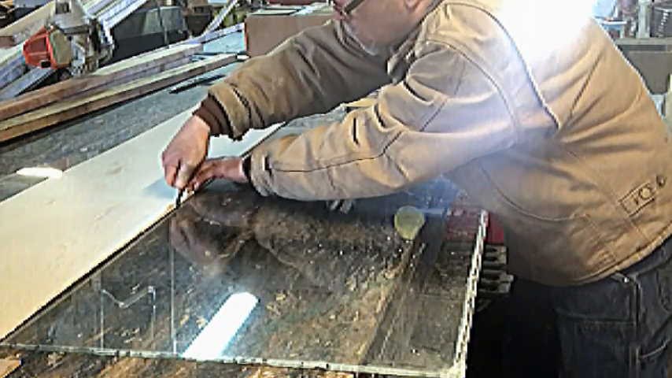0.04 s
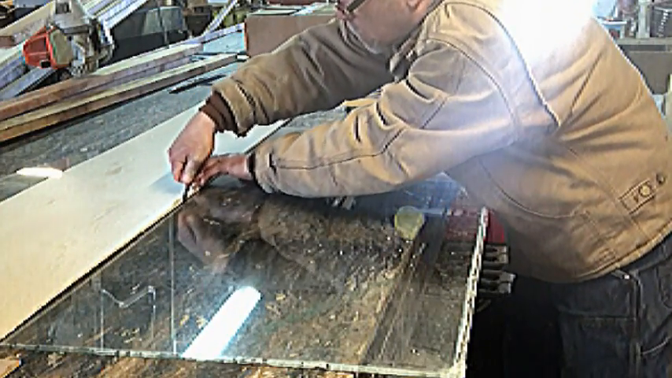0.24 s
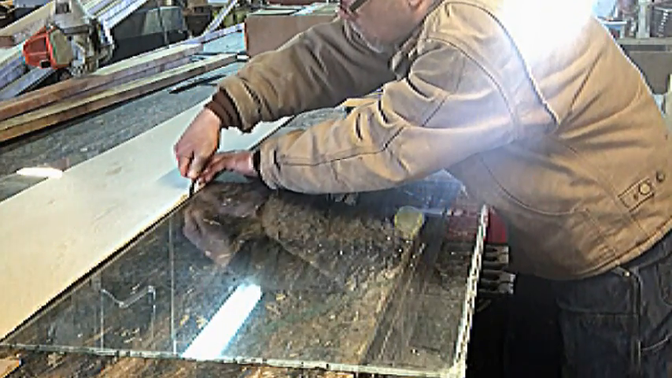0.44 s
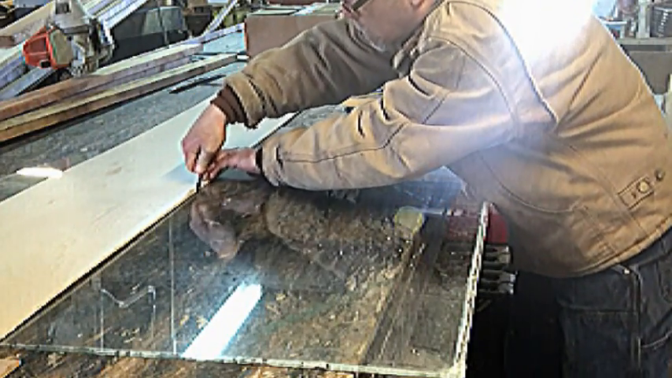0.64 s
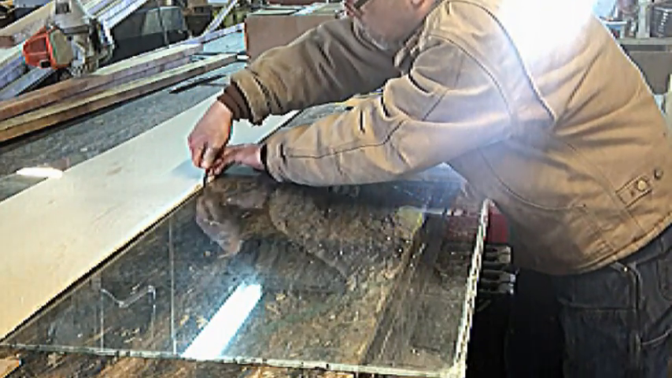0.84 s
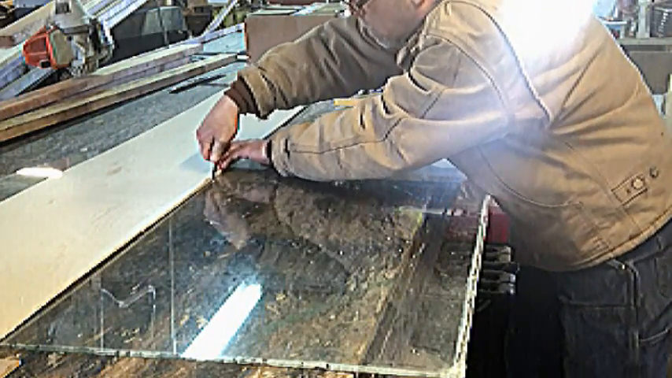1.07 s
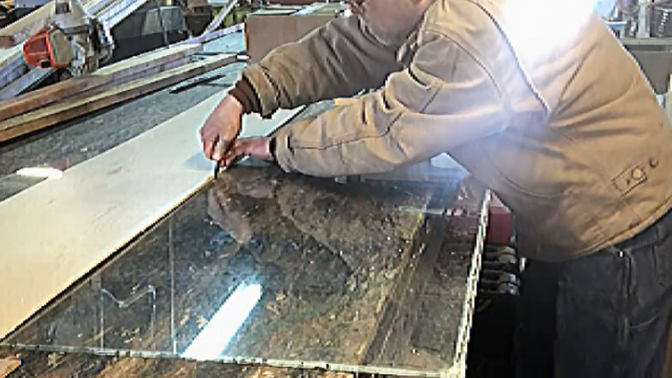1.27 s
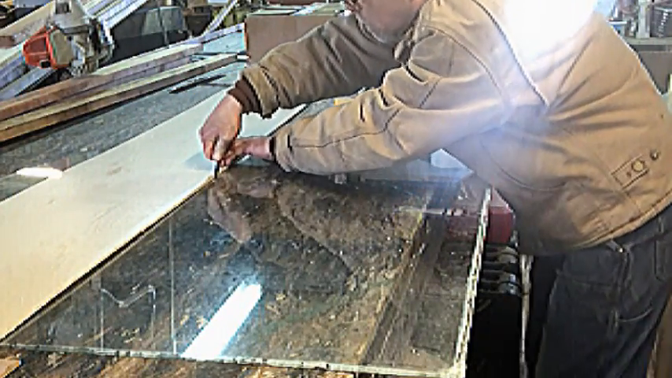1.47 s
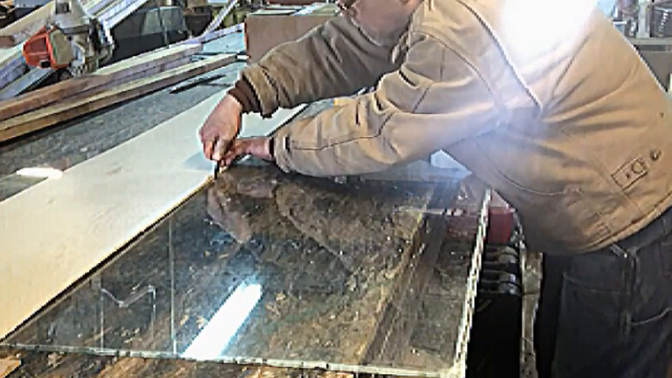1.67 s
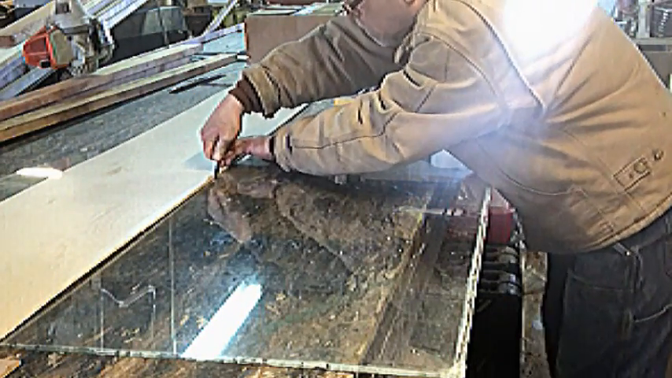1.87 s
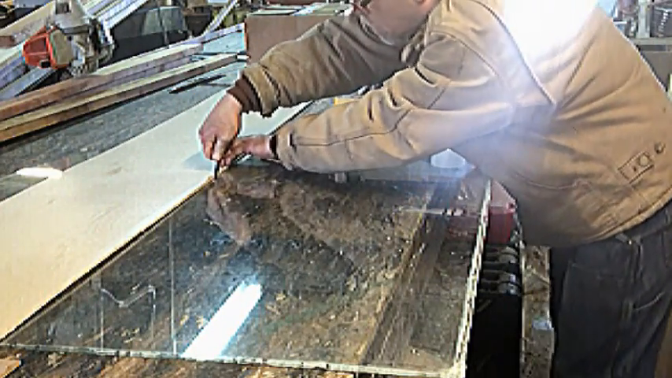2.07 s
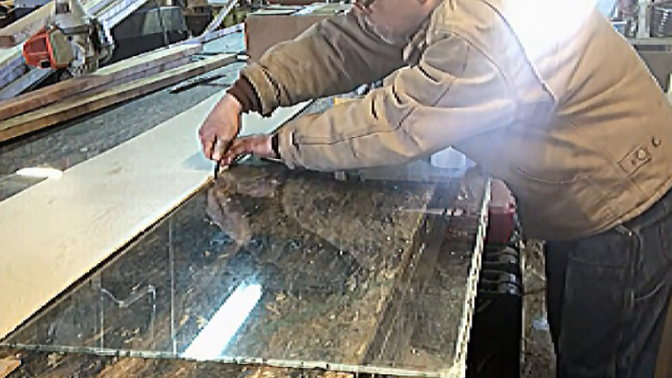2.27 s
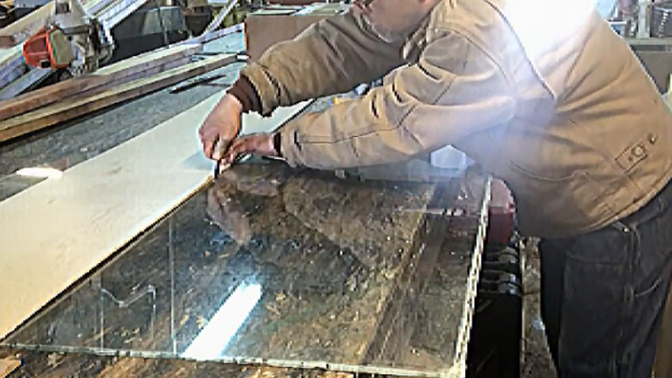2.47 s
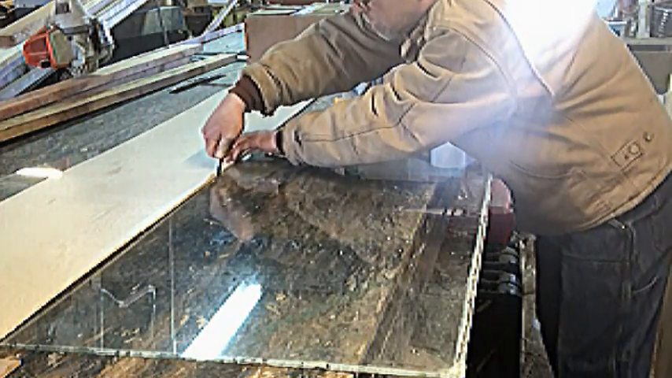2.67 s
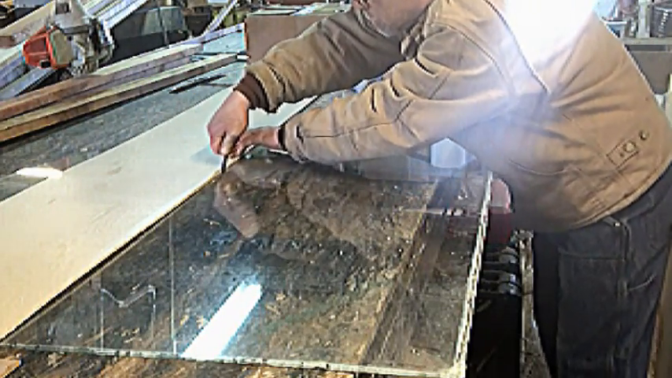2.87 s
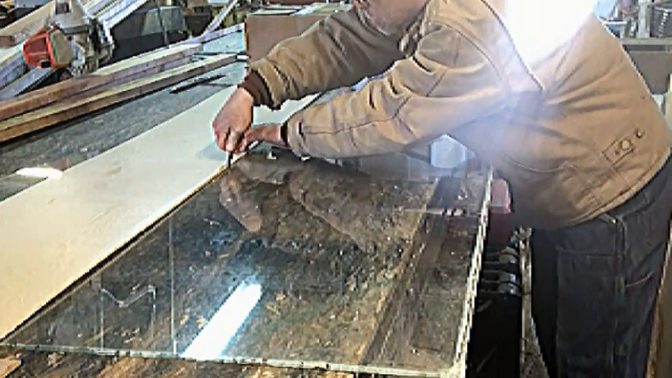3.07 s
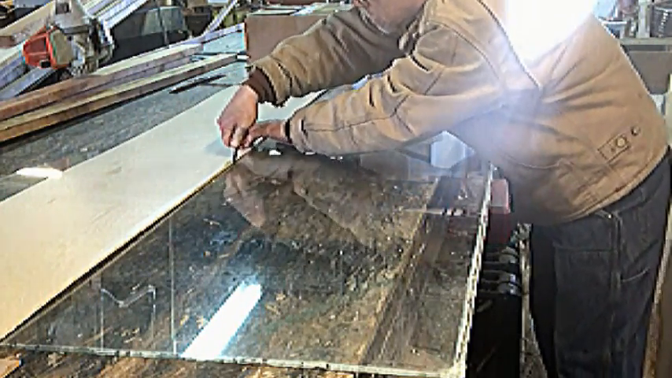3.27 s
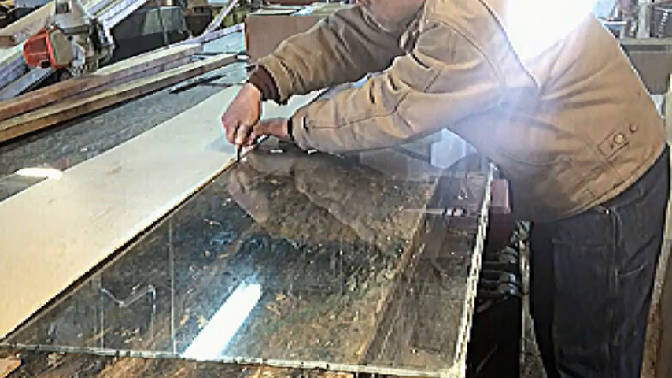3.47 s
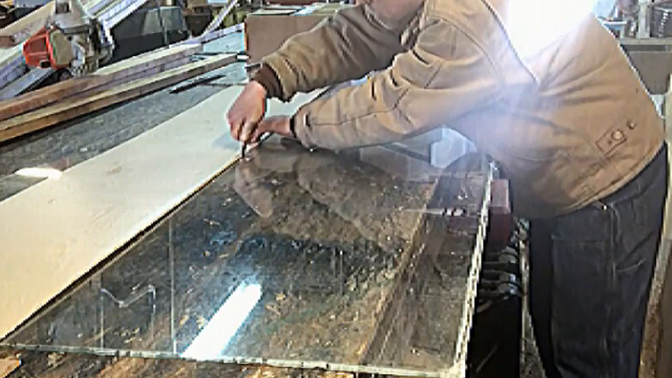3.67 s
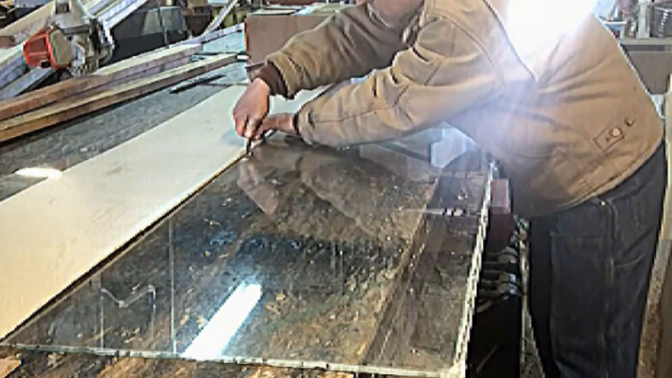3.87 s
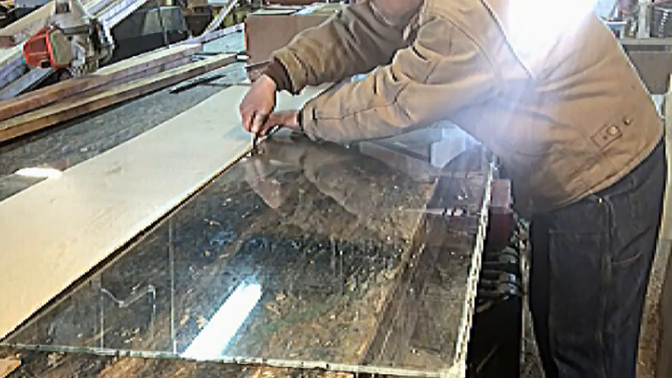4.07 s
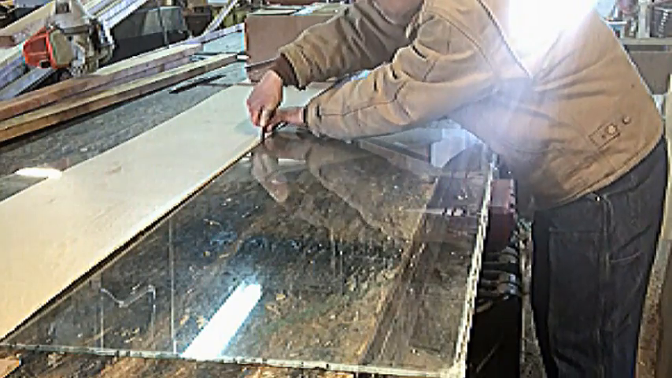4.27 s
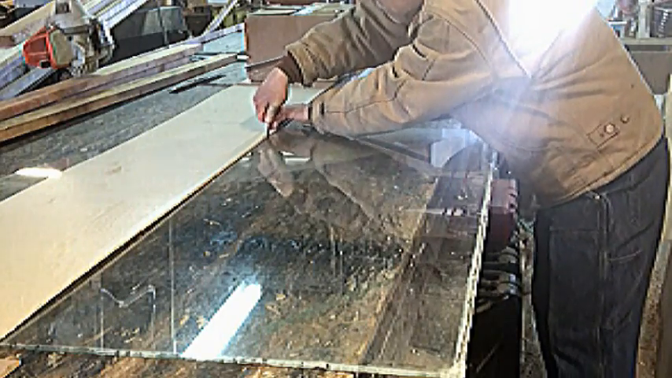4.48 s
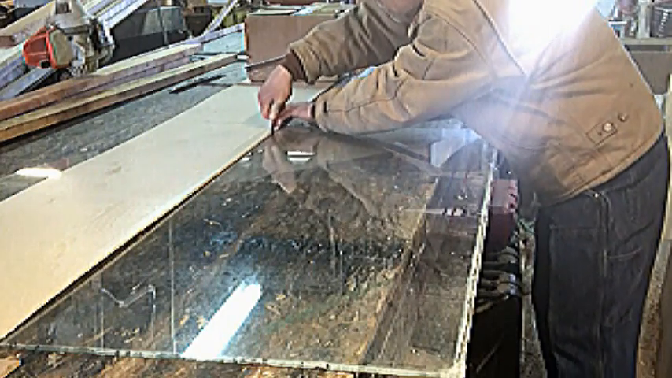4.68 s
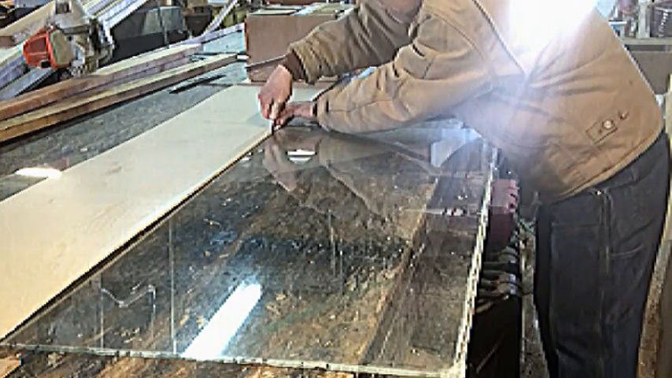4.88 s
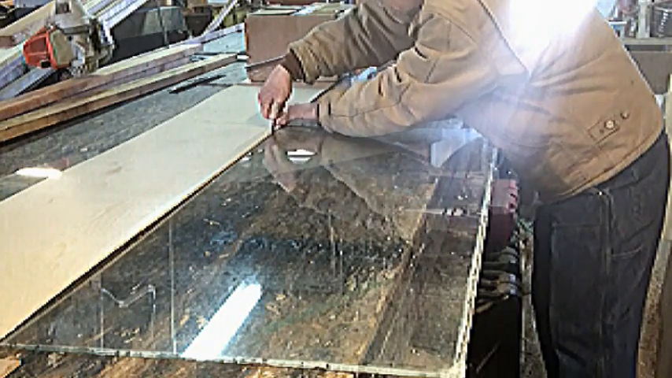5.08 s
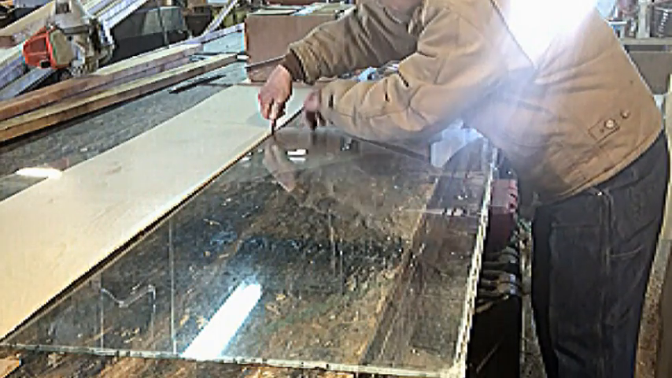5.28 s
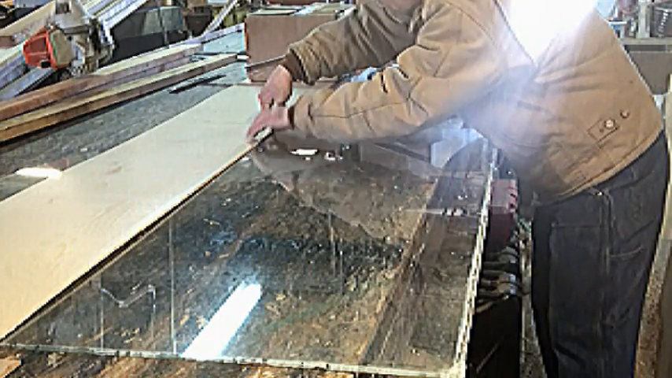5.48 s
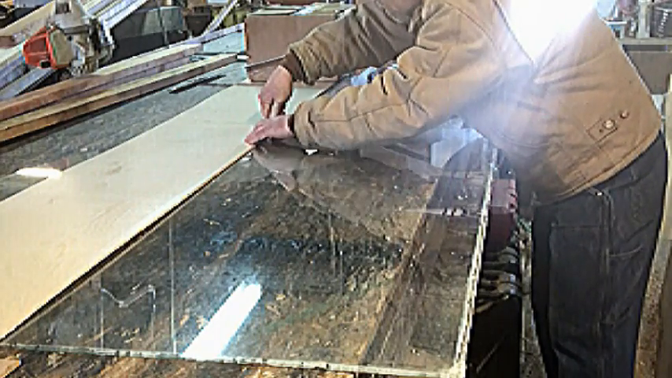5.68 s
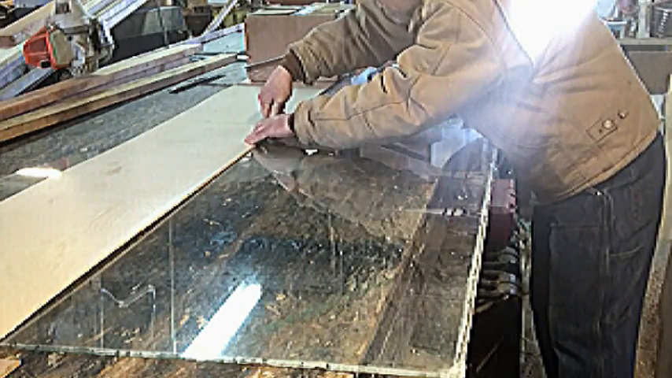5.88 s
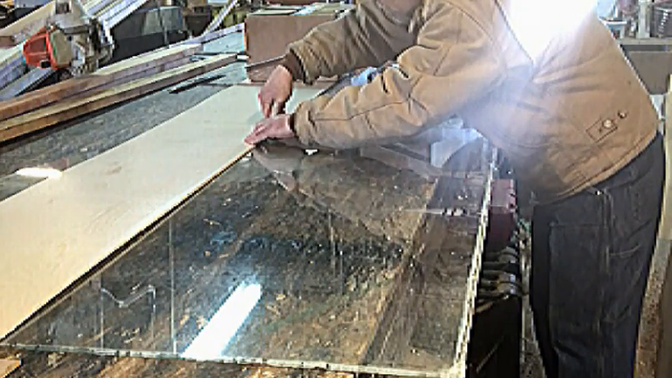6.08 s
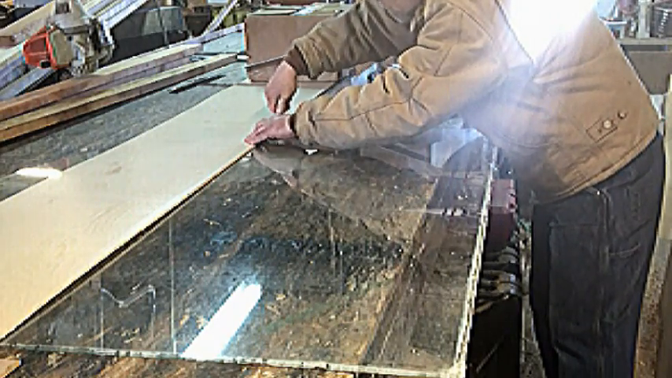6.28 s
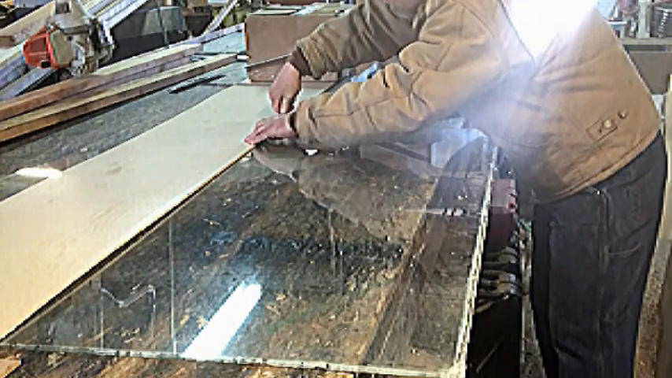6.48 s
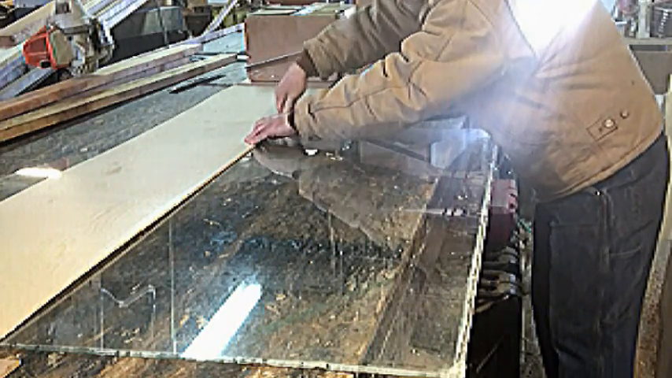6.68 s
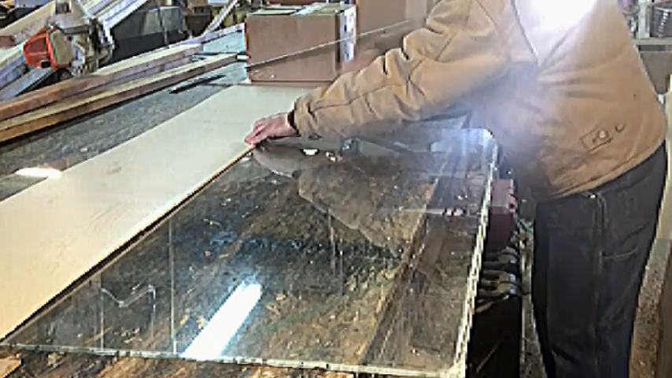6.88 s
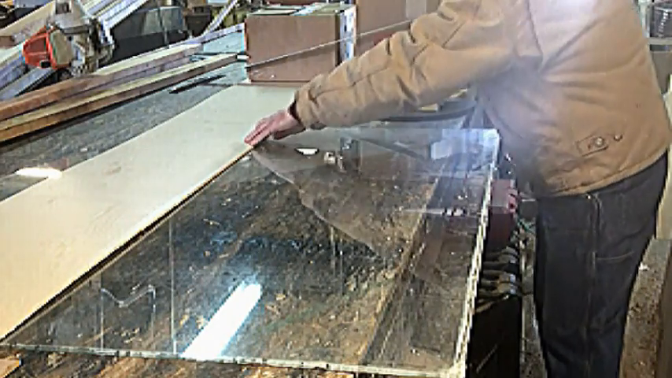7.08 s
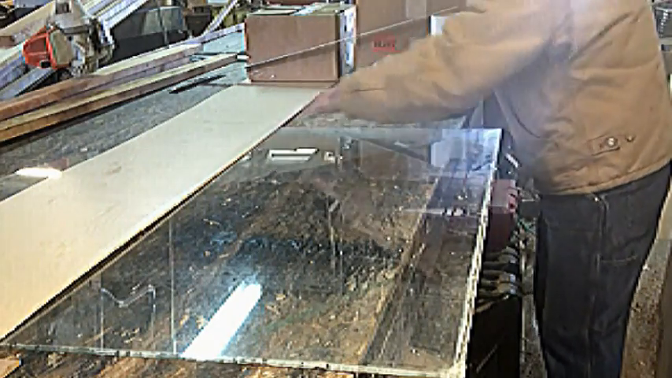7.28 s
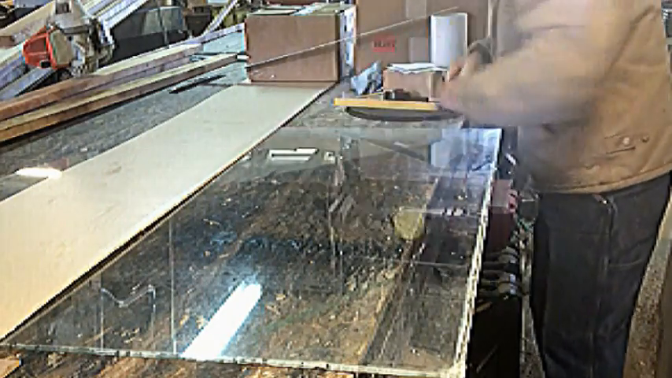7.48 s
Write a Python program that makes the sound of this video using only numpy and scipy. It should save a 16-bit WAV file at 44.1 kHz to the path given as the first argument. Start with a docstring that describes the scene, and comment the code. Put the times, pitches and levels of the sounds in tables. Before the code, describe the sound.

A hand-held glass cutter scores a pane close by in a workshop, making a gritty, ringing hiss with tiny crackles. It pauses for soft rubs and bumps of the straightedge, then makes a second, longer stroke. After a few light taps, a brief final stroke runs off the edge and strikes the bench with a sharp thud. Faint air noise and electrical hum lie underneath.

```python
"""A gritty, ringing hiss, close by in a workshop: a glass cutter's wheel scores a pane in three strokes.
Each tiny chip crushed out of the glass is an impulse that excites bending waves. These radiate best at
coincidence, where they match the speed of sound, and the ring changes as the wheel travels.
Between strokes the hands shift and bump the straightedge; the last stroke runs off the edge and strikes
the bench, which thuds and sways. Air noise and mains hum lie underneath."""
import sys
import numpy as np
from scipy import signal
from scipy.fft import rfft, irfft
from scipy.io import wavfile
from scipy.ndimage import uniform_filter1d

SR = 44100
rng = np.random.default_rng(int(sys.argv[2]) if len(sys.argv) > 2 else 0)


def bounce(signal):
    """Save signal as a 16-bit WAV file at the path given by the first command-line argument."""
    frames = np.transpose(np.atleast_2d(signal))
    limited = np.clip(frames, -1, 1)
    pcm = np.round(limited * 32767).astype(np.int16)
    wavfile.write(sys.argv[1], SR, pcm)


N = 332514
TIME = np.arange(N) / SR

# Levels in the tables are relative.
# spectrum of the workshop's air noise: f/Hz, level/dB
AIR_SPECTRUM = [(18, -46.5), (33, -2), (58, -1.5), (88, -3.5), (125, -4.5), (180, -8), (560, -13.5),
                (1300, -17), (2700, -23.5), (3700, -24), (6500, -28.5), (10300, -36.5), (12500, -35),
                (15500, -35)]
# mains hum: f/Hz, level/dB
HUM_PARTIALS = [(59.2, -62), (118.4, -65.5)]
# sliding rubs, and two low swells as the straightedge is dragged: t/s, half length/s, level/dB, centre f/Hz,
# bandwidth/Hz
SWELLS = [(1.267, 0.033, -45.5, 1660, 2520), (1.681, 0.042, -46, 2560, 5360),
          (1.705, 0.056, -44.5, 1240, 1220), (1.712, 0.11, -46.5, 150, 170),
          (2.038, 0.16, -55.5, 2290, 5740), (2.167, 0.29, -51.5, 179, 170), (4.88, 0.088, -51, 1060, 1550),
          (5.141, 0.049, -53, 3880, 5000), (5.259, 0.018, -46, 3920, 4200), (5.533, 0.013, -58, 4500, 7000),
          (7.0, 0.21, -63.5, 2910, 7600), (7.12, 0.063, -56, 4670, 5500), (7.485, 0.09, -54, 600, 1400)]
# blows on pane and bench: t/s, thud level/dB, clack level/dB, tick level/dB, clack cutoff f/Hz
KNOCKS = [(1.527, -41.5, -46, -58, 1400), (1.546, -37.5, -34.5, -51, 1280), (1.555, -44, -43, -46, 1490),
          (1.909, -68, -52, -61.5, 2200), (1.951, -36.5, -45, -58, 1580), (1.975, -34, -45.5, -53, 915),
          (1.995, -37, -54, -73, 400), (2.019, -41, -44.5, -57, 1800), (2.083, -43, -49.5, -61, 1500),
          (4.767, -47, -54, -68, 400), (4.843, -61.5, -63, -56, 2000), (5.102, -47.5, -72, -70, 250),
          (5.218, -48, -60, -57, 300), (5.519, -58, -64, -54, 600), (6.308, -22, -18, -28, 1700),
          (6.358, -34.5, -38.5, -53, 700), (6.513, -47, -62.5, -62.5, 696), (7.447, -66, -35.5, -63, 590)]
# modes of the bench: f/Hz, level/dB, T60/s
BENCH_MODES = [(49.4, -8.5, 0.27), (101.4, -2.5, 0.077), (111, -2.5, 0.18), (131, 0, 0.083),
               (156, -1.5, 0.13), (241.6, -6.5, 0.17), (264.6, -6.5, .1)]
# modes of the pane lying on it: f/Hz, level/dB, T60/s
PANE_MODES = [(342, -6, 0.082), (378, 2.5, 0.069), (466, -26, 0.097), (529, 5.5, 0.081), (588, -0.5, 0.11),
              (640, 1, 0.025), (790, 3, 0.042), (887, 4, 0.088), (1167, -9, 0.065), (1640, -2, 0.1),
              (1890, 0.5, 0.11), (1930, 2, 0.063)]
# strokes: start t/s, end t/s, slowing time/s, hiss level/dB, rolling level/dB, shudder level/dB,
# level of the ring's extra peak/dB, ring centre at the start f/Hz, at the end f/Hz
STROKES = [(0.0, 1.241, 0.12, -4.5, -14.5, -30, -10, 3690, 3720),
           (2.637, 4.732, 0.36, -2.5, -12, -22, -28, 3704, 3770),
           (6.101, 6.308, 0.006, -2, -17, -43, 0, 3760, 3850)]
# hand pressure, as the ring it excites, one curve per stroke: t/s, level/dB
PRESSURE_CURVES = [
    [(0, -26), (.42, -26.5), (.63, -23), (.78, -27), (.95, -22.5), (1.24, -28.5)],
    [(2.635, -28), (2.8, -28.5), (3.07, -24), (3.42, -26), (3.75, -26), (4.18, -22.5), (4.42, -24.5),
     (4.65, -23.5), (4.735, -28)],
    [(6.105, -29), (6.165, -19), (6.235, -18.5), (6.31, -14.5)],
]
# the wheel skids and loses its bite: t/s, half length/s, ring change/dB, hiss change/dB
SKIDS = [(0.355, 0.01, -14, -11), (0.383, 0.011, -10, -6), (.745, 0.0062, -9, -6), (0.82, 0.0068, -22, -5),
         (0.872, .013, -15, -5.5), (1.166, 0.0098, -4, -4), (2.75, 0.0083, -6, -4),
         (3.467, 0.014, -16, -12), (3.609, 0.0076, -19, -13), (3.686, 0.014, -12, -7),
         (4.49, 0.031, -6, -1.5), (6.28, 0.023, -4.5, 3.5)]
# lone ticks as the wheel is pressed in, and the biggest chips along the score: t/s, level/dB
BIG_CHIPS = [(0.1149, -12), (0.236, -14.5), (0.3671, -16), (0.4428, -11.5), (0.6568, -16), (0.7256, -12.5),
             (0.8347, -9), (0.8898, -15), (0.9296, -16), (2.4237, -16.5), (2.4308, -18.5), (2.444, -14.5),
             (2.4623, -16.5), (2.5677, -20.5), (2.5865, -18.5), (2.6072, -16), (2.6267, -17), (2.669, -9.5),
             (2.6987, -11.5), (3.1484, -8.5), (3.474, -20), (3.6176, -12), (3.8649, -6), (4.2287, -16),
             (4.2476, -13), (5.9859, -17.5), (6.0308, -13.5), (6.0634, -14.5), (6.104, -28)]
# spectrum of the rolling noise: f/Hz, level/dB
ROLL_SPECTRUM = [(60, -17.5), (140, 5), (195, -3), (240, 2), (360, 5), (450, -0.5), (540, 2.5),
                 (1000, -1.5), (1500, 0), (1900, -0.5), (2200, -7), (3500, 1.5), (8000, -62)]
# the pane's strongest low resonance under the travelling wheel: t/s, f/Hz
SPOT_RESONANCE = [(0, 243), (.45, 265), (.85, 350), (3.35, 350), (3.6, 620), (3.85, 650), (4.3, 670),
                  (4.74, 480), (6.1, 407)]
# spectrum of the splintering hiss: f/Hz, level/dB
HISS_SPECTRUM = [(2000, -22.5), (3200, -10.5), (4200, -8), (4800, -7.5), (5700, -1.5), (6700, -5),
                 (7600, -13), (8500, -4.5), (9500, -6), (10500, -16.5), (11100, -13.5), (11800, -5.5),
                 (13500, -7), (15500, -13.5)]
# spectrum of the ring around coincidence: f/centre frequency, level/dB
RING_SPECTRUM = [(.4, -29), (.62, -21), (.78, -13.5), (.89, -4.5), (.97, 0.5), (1.06, 1), (1.141, -7),
                 (1.26, -13), (1.6, -10.5), (2.4, -31.5)]

USUAL_DB = -28  # ring level at the usual hand pressure
HISS_GROWTH, ROLL_GROWTH = 0.71, 0.58  # dB gained for each dB of ring
SLOWING_DB = -10  # fall of rolling noise and shudder as the wheel stops


def undb(db):
    """Amplitude ratio of a level in decibels."""
    return 10 ** (np.asarray(db) / 20)


def unit(x):
    """Normalisation to rms 1."""
    return x / np.sqrt(np.mean(x ** 2))


def unit_attack(x):
    """Normalisation to rms 1 over the first 20 ms."""
    return x / np.sqrt(np.mean(x[:SR // 50] ** 2))


def fade(t60_s, size):
    """Exponential decay, size samples long."""
    return np.exp(-np.log(1000) * TIME[:size] / t60_s)


def swell(s, half_s):
    """Gaussian envelope around time s."""
    return np.exp(-((TIME - s) / half_s) ** 2)


def curve(points, s):
    """Linear interpolation of (t/s, value) points."""
    return np.interp(s, *np.transpose(points))


def walk(rate):
    """Smooth random modulation of rms 1, changing about rate times a second."""
    step = int(SR / rate)
    held = np.repeat(rng.standard_normal(N // step + 1), step)
    return unit(uniform_filter1d(held, step)[:N])


def add(out, s, x):
    """Superposition of x on out from time s."""
    i = max(int(s * SR), 0)
    out[i:i + len(x)] += x[:N - i]


def convolve(x, response):
    """Output of a linear system with this impulse response."""
    return signal.fftconvolve(x, response)[:len(x)]


def band(x, hz, width_hz):
    """A second-order resonance."""
    return signal.lfilter(*signal.iirpeak(hz, hz / width_hz, fs=SR), x)


def cut(x, order, hz, kind="low"):
    """A Butterworth low-pass or high-pass filter."""
    return signal.sosfilt(signal.butter(order, hz, kind, fs=SR, output="sos"), x)


def colour(points, size=4096):
    """Minimum-phase response of unit energy with a spectrum of (f/Hz, level/dB) points."""
    hz, db = np.transpose(points)
    bins_hz = np.fft.rfftfreq(size, 1 / SR)
    gain = undb(np.interp(np.log(bins_hz + 1), np.log(hz), db))
    cepstrum = irfft(np.log(gain))[:size // 2]
    cepstrum[1:] *= 2
    response = irfft(np.exp(rfft(cepstrum, size)))
    return response / np.linalg.norm(response)


def scatter(t60_s, rise_s, even_hz, size=4096):
    """Diffuse reflections build up and die; their spectrum is ribbed, but flat averaged over even_hz."""
    build_up = 1 - np.exp(-TIME[:size] / rise_s)
    spectrum = rfft(rng.standard_normal(size) * fade(t60_s, size) * build_up)
    spectrum /= np.sqrt(uniform_filter1d(abs(spectrum) ** 2, int(even_hz * size / SR) + 1))
    return irfft(spectrum) * np.cos(np.linspace(0, np.pi / 2, size)) ** 2


def impulses(rate, bite, spread_db=3, steady_s=0.042):
    """Shot noise: random crackle, weighted by bite and normalised to a steady short-term level."""
    events = rng.random(N) < rate / SR
    force = events * undb(spread_db * rng.standard_normal(N)) * rng.choice([-1, 1], N) * bite
    power = uniform_filter1d(force ** 2, int(steady_s * SR))
    return force / np.sqrt(np.maximum(power, 1e-9))


def workshop_background():
    """Broadband air noise under which the mains hums at two harmonics."""
    air = unit(convolve(rng.standard_normal(N), colour(AIR_SPECTRUM)))
    air *= undb(-53.5 + walk(rate=7.8))
    hum = sum(undb(db) * np.sqrt(2) * np.sin(2 * np.pi * (hz * TIME + rng.random()))
              for hz, db in HUM_PARTIALS)
    return air + hum


def room_echo(x, size=26000):
    """Reverberation of a cluttered workshop: a quick tail, longer in the bass."""
    noise = rng.standard_normal((2, size)) * (1 - np.exp(-TIME[:size] / 0.017)) / np.sqrt(SR)
    low = cut(noise[0], 2, 1500) * fade(t60_s=0.25, size=size)
    high = cut(noise[1], 2, 1500, "high") * fade(t60_s=0.21, size=size)
    return convolve(x, undb(8) * (low + high))


def bench_rumble(load_gain):
    """Forced vibration at the bench's lowest resonance, and a dying sway as the cutter leaves the edge."""
    shudder = band(band(rng.standard_normal(N), hz=48.9, width_hz=15), hz=50.3, width_hz=47)
    sway = np.zeros(N)
    rise = np.minimum(TIME / 0.03, 1)
    add(sway, STROKES[-1][1], undb(-31) * rise * fade(t60_s=0.42, size=N))
    return unit(shudder) * (load_gain + sway)


def rubs_and_drags():
    """Band-passed grainy noise: stick-slip rubs, and two low swells as the straightedge is dragged."""
    out = np.zeros(N)
    crackle = impulses(rate=2300, bite=undb(3.1 * walk(rate=310)))
    grain = convolve(crackle, scatter(t60_s=0.047, rise_s=0.00045, even_hz=500))
    for s, half_s, db, hz, width_hz in SWELLS:
        noise = band(band(grain, hz, width_hz), hz, width_hz)
        out += undb(db) * swell(s, half_s) * unit(noise)
    return out


def modes(table, size):
    """Free vibration after a blow at a random spot: damped modes of random sign, slightly detuned."""
    out = np.zeros(size)
    for hz, db, t60_s in table:
        amplitude = undb(db) * rng.choice([-1, 1])
        detuned_hz = hz * (1 + 0.0146 * rng.standard_normal())
        out += amplitude * np.sin(2 * np.pi * detuned_hz * TIME[:size]) * fade(t60_s, size)
    return out


def knocks(size=40000):
    """Impact excitation: the bench thuds, the pane clacks and ticks; a soft contact dulls the clack."""
    out = np.zeros(N)
    inertia = 1 - np.exp(-TIME[:size] / 0.0093)  # the heavy bench is slow to get moving
    for s, thud_db, clack_db, tick_db, cutoff_hz in KNOCKS:
        thud = modes(BENCH_MODES, size) * inertia
        crack = band(scatter(t60_s=0.061, rise_s=0.0013, even_hz=320, size=size), hz=734, width_hz=4800)
        pane = undb(-8.5) * unit_attack(modes(PANE_MODES, size))
        clack = cut(pane + unit_attack(crack), 3, cutoff_hz)
        tick = band(scatter(t60_s=0.065, rise_s=0.0008, even_hz=900, size=size), hz=3280, width_hz=2800)
        for db, part in (thud_db, thud), (clack_db, clack), (tick_db, tick):
            add(out, s, undb(db) * unit_attack(part))
    return out


def pane_roll(s):
    """Damped response of the pane on the bench; each driving point favours one low resonance."""
    response = convolve(scatter(t60_s=0.081, rise_s=0.00089, even_hz=110), colour(ROLL_SPECTRUM))
    return response + undb(0.5) * band(response, curve(SPOT_RESONANCE, s), width_hz=52)


def pane_hiss(s, lag_samples=52):
    """Diffuse field: a chip's treble spreads through the glass, alike from every spot, after the ring."""
    spread = scatter(t60_s=0.1, rise_s=0.0007, even_hz=403)
    return convolve(np.pad(spread, (lag_samples, 0)), colour(HISS_SPECTRUM))


def pane_ring(s):
    """Coincidence radiation of a bending wave and its edge reflections; the centre glides in a stroke."""
    nearest = min(STROKES, key=lambda stroke: max(stroke[0] - s, s - stroke[1]))
    start, end, *_, peak_db, from_hz, to_hz = nearest
    centre_hz = np.interp(s, [start, end], [from_hz, to_hz]) * (1 + 0.008 * rng.standard_normal())
    waves = scatter(t60_s=0.02, rise_s=0.00028, even_hz=250)
    waves[0] += 0.6  # the direct wave from the wheel
    response = convolve(waves, colour(np.array(RING_SPECTRUM) * [centre_hz, 1]))
    response += undb(peak_db) * band(response, centre_hz, width_hz=330)
    return response / np.linalg.norm(response)


def travel(force, response_at, spots=40):
    """A moving driving point: the pane's response crossfades from one spot's to the next."""
    out, hop = np.zeros(N), N // spots
    for start in range(-hop, N - 1, hop):
        i = np.arange(max(start, 0), min(start + 2 * hop, N))
        part = force[i] * np.sin(np.pi * (i - start) / (2 * hop))
        if part.any():
            add(out, i[0] / SR, signal.fftconvolve(part, response_at((start + hop) / SR)))
    return out


def hand_pressure():
    """Excitation grows with load: gains of ring and hiss, dented by skids, and of rolling and shudder."""
    gains = np.zeros((4, N))
    skid_ring = sum(db * swell(s, half_s) for s, half_s, db, _ in SKIDS)
    skid_hiss = sum(db * swell(s, half_s) for s, half_s, _, db in SKIDS)
    for stroke, pressure in zip(STROKES, PRESSURE_CURVES):
        start, end, slowing_s, hiss_db, roll_db, shudder_db, *_ = stroke
        extra_db = curve(pressure, TIME) - USUAL_DB
        slowing_db = SLOWING_DB * np.clip(1 - (end - TIME) / slowing_s, 0, 1)
        levels = np.array([extra_db + skid_ring,
                           hiss_db + HISS_GROWTH * extra_db + skid_hiss,
                           roll_db + ROLL_GROWTH * extra_db + slowing_db,
                           shudder_db + extra_db + slowing_db])
        touching = (TIME >= start) & (TIME <= end)
        gains[:, touching] = undb(USUAL_DB + levels[:, touching])
    return gains


def big_chips(size=600):
    """Impulsive force of single fractures: a snap, then brief crumbling."""
    force = np.zeros(N)
    for s, db in BIG_CHIPS:
        crumble = rng.standard_normal(size) * fade(t60_s=0.012, size=size)
        chip = undb(-1.5) * crumble / np.linalg.norm(crumble)
        chip[0] += 1  # the snap
        add(force, s, undb(db - 4.5) * chip)
    return force


def scoring(ring_gain, hiss_gain, roll_gain):
    """Brittle fracture: coarse chips ring the pane, fine ones hiss and roll. Returns (ring, the rest)."""
    bite = walk(rate=130)  # the wheel grips and skips, so chips come in bursts
    grip = undb(1.03 * walk(rate=25))  # the hand is never quite steady
    coarse = impulses(rate=1000, bite=undb(1.86 * bite))
    fine = impulses(rate=6000, bite=undb(3.26 * bite))
    big = big_chips()
    ring_force = (undb(-1.5) * coarse + undb(-6.5) * fine) * ring_gain * grip + undb(15) * big
    hiss_force = (undb(-8.5) * coarse + undb(-2.5) * fine) * hiss_gain * grip + undb(11) * big
    roll_force = fine * roll_gain + undb(-7) * big
    return travel(ring_force, pane_ring), travel(hiss_force, pane_hiss) + travel(roll_force, pane_roll)


def scene():
    """Superposition at one point; the pane beams its ring that way, so the room gets less of it."""
    ring_gain, hiss_gain, roll_gain, load_gain = hand_pressure()
    ring, crushing = scoring(ring_gain, hiss_gain, roll_gain)
    rest = crushing + knocks() + rubs_and_drags()
    echo = room_echo(undb(-1) * ring + rest)
    mono = ring + rest + echo + bench_rumble(load_gain) + workshop_background()
    return np.array([mono, mono])


def record(dry):
    """Band limiting removes the deepest bass and the highest treble."""
    lean = cut(dry, 4, 32, "high")
    return signal.sosfilt(signal.ellip(10, 0.2, 80, 15600, fs=SR, output="sos"), lean)


dry = scene()
out = record(dry)
bounce(out)
```